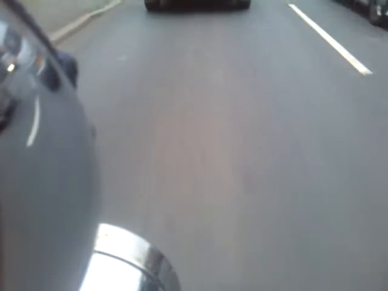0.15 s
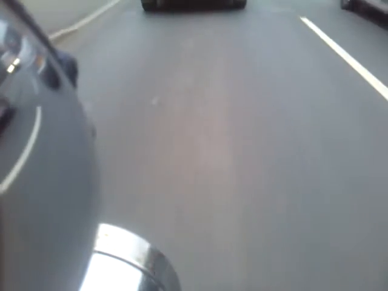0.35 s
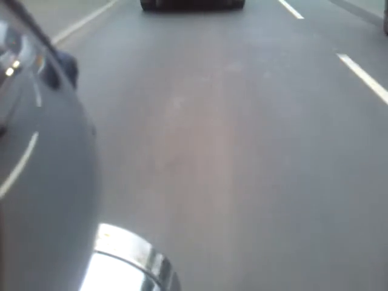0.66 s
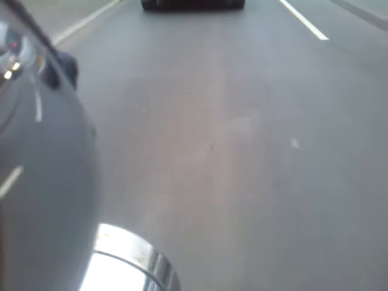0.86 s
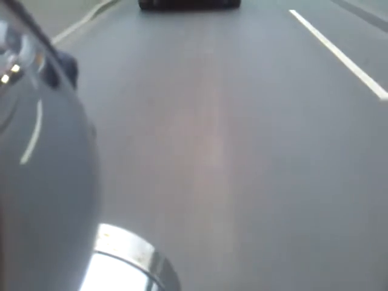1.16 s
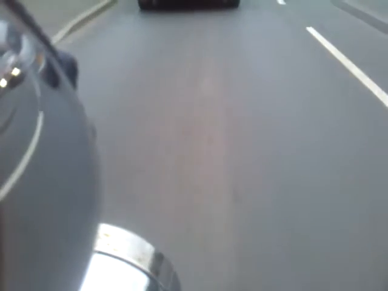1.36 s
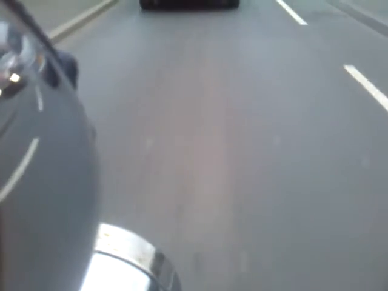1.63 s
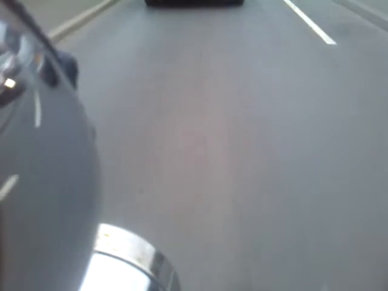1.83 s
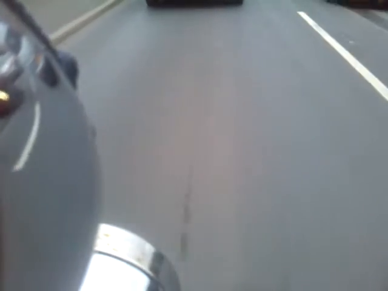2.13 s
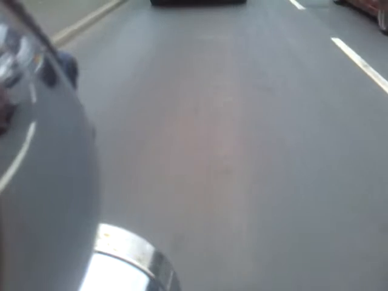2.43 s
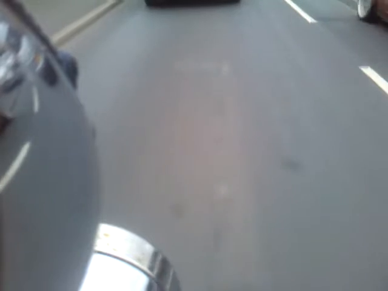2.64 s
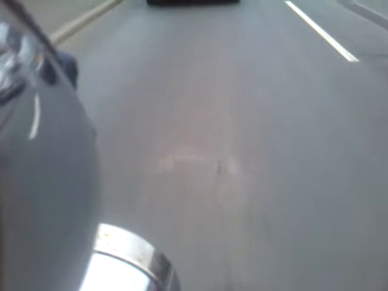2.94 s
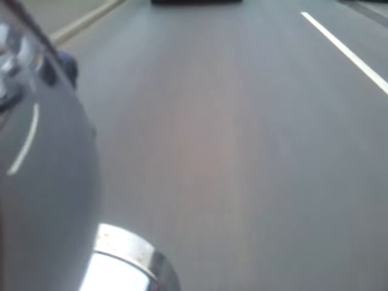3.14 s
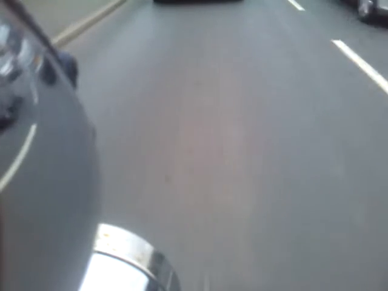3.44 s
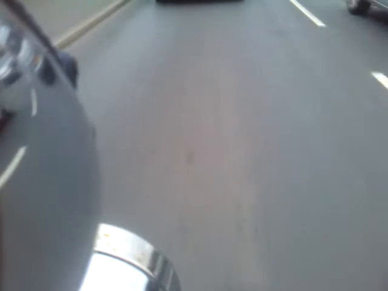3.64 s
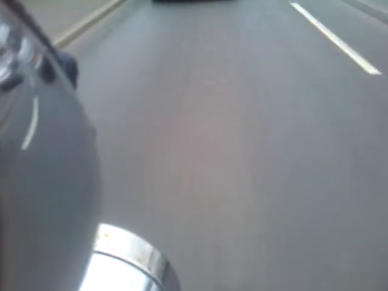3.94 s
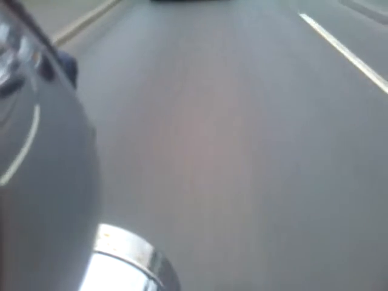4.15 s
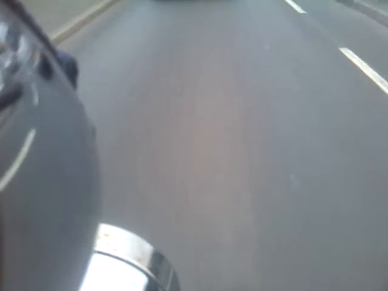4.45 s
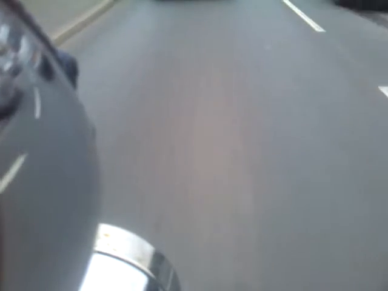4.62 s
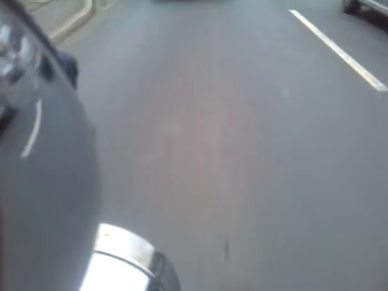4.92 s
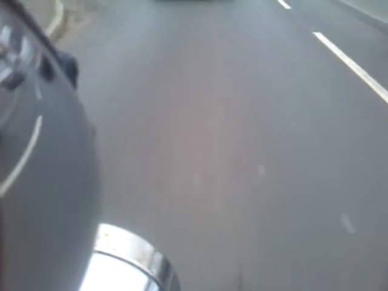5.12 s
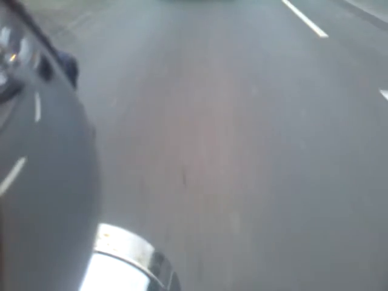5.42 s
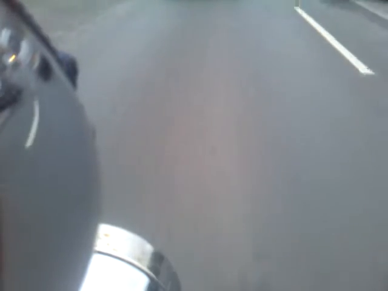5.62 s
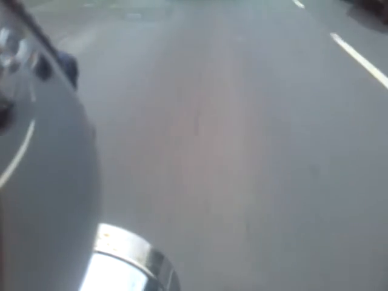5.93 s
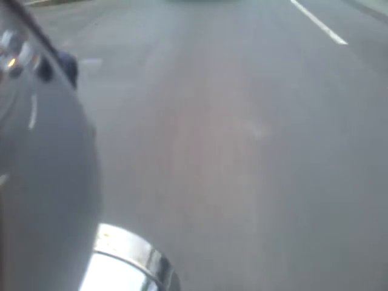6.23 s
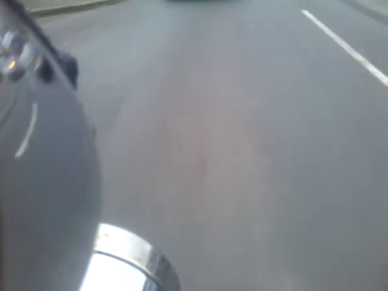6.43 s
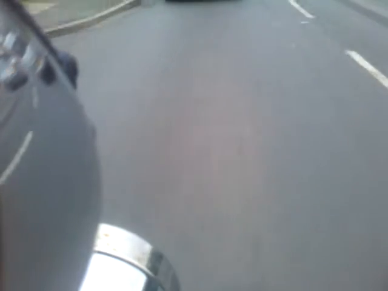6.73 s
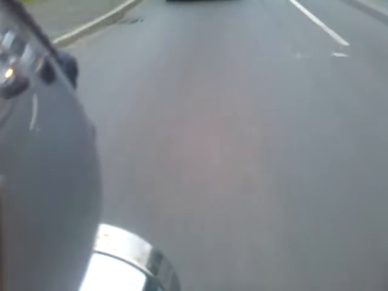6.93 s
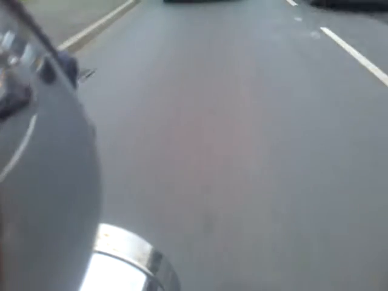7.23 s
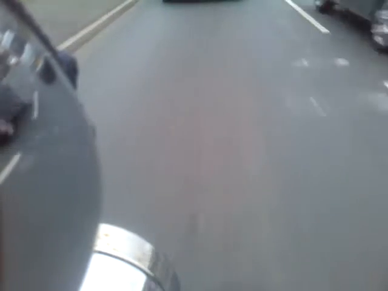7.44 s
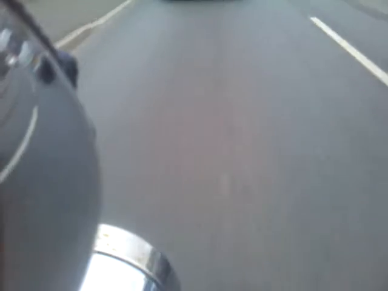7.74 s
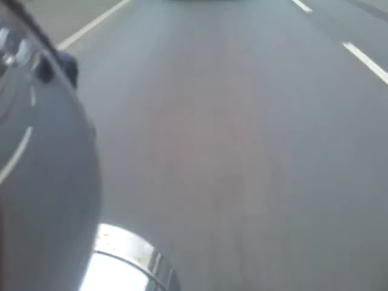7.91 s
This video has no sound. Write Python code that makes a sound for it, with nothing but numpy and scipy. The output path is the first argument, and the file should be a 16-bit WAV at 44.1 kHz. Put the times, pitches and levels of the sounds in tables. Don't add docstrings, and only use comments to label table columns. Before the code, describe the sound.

A motorcycle cruises in a low, rattly drone, then opens up, its engine and gear whine climbing as wind batters and overloads the microphone.

```python
import sys
import numpy as np
from scipy import signal
from scipy.fft import rfft, irfft
from scipy.io import wavfile
from scipy.ndimage import uniform_filter1d

SR = 44100
rng = np.random.default_rng(int(sys.argv[2]) if len(sys.argv) > 2 else 0)


def attenuation_scalar(level_db):
    decades = np.asarray(level_db, float) / 20
    return 10 ** decades


def to_wav(s):
    ch = np.atleast_2d(s).T
    pcm = np.round(np.clip(ch, -1, 1) * 32767)
    wavfile.write(sys.argv[1], SR, pcm.astype(np.int16))


N = 355887
TIME = np.arange(N) / SR

# frequency [Hz], density [dB per Hz].
ROAR_SPECTRUM = [(20, -27), (40, -10.5), (90, -2), (150, 0), (350, -8), (620, -17.5), (1350, -17),
                 (1960, -33.5), (2790, -30), (4290, -41), (4780, -49.5), (9800, -52), (11500, -55.5),
                 (15600, -60)]
# time [s], level [dB].
ROAR_LEVEL = [
    (0, -27.5),
    (2, -27),
    (4, -25),
    (5.5, -25),
    (6.5, -22),
    (8.07, -25.5),
]
# frequency [Hz], width [Hz], level [dB].
CAVITIES = [(350, 60, -37), (690, 40, -44), (1310, 200, -40), (1750, 150, -52), (2800, 120, -61),
            (6200, 400, -72), (9400, 600, -72)]
# frequency [Hz], density [dB per Hz].
WIND_SPECTRUM = [(20, -33), (45, -13.5), (90, -6), (200, -9), (400, -13.5), (800, -23), (2000, -35),
                 (4000, -47.5), (8000, -65), (15000, -70)]
# middle [s], length [s], rise [dB], brightening [dB].
GUST_TIMES = [(.65, 0.068, 3, -15), (1.5, 0.033, 3, 0), (2.3, 0.082, 1.5, -5), (2.765, 0.031, 5, -21),
              (3.6, 0.058, 1.5, -1), (5.55, 0.14, 2.5, -3), (5.83, 0.053, 5.5, -4.5),
              (5.95, 0.084, 2.5, -6), (6.28, 0.15, 4, -1.5), (6.43, .12, 3, 0.5), (6.76, 0.21, 2, 2),
              (7.04, 0.26, 4.5, 3), (7.38, 0.088, 0.5, 4.5), (7.6, 0.085, 2, -1.5), (7.84, 0.096, 5, -4.5),
              (7.98, .05, 3.5, 2)]
# start [s], peak [dB], frequency [Hz].
SLAPS = [(.906, -25, 494.3), (2.542, -15.5, 356.3), (2.32, -23, 536), (2.759, -11.5, 229.6),
         (2.771, -13, 257.2), (2.814, -20, 250), (6.229, -18.5, 1973), (6.301, -13.5, 1070),
         (6.973, -18, 906), (7.016, -21, 1760), (7.129, -23, 1820), (7.159, -13, 755), (7.366, -23, 1560),
         (7.422, -16, 774), (7.734, -16, 798), (7.836, -23, 1190), (7.878, -21.5, 670.2),
         (7.981, -23, 1440)]
# start [s], length [s], frequency [Hz], level [dB].
PASSING_SQUEAK = (4.428, .058, 11825, -63)
# middle [s], length [s], rise [dB].
ROAD_BUMPS = [(.03, 0.063, 19.5), (.98, .04, 2), (1.12, 0.059, 5.5), (2.15, .12, 3), (3.33, .05, 3),
              (3.46, 0.053, 3), (3.61, 0.041, 4), (3.75, 0.039, 7), (4.63, .08, 10), (4.78, 0.062, 7),
              (4.98, .1, 9)]
# frequency [Hz], width [Hz], level [dB].
RINGING_MODES = [(4240, 130, 7), (5240, 120, -9), (10470, 100, -2), (11160, 180, -1), (12580, 90, -1)]
# frequency [Hz], width [Hz], level [dB].
DRY_MODES = [(6700, 300, -6), (7420, 130, -1), (7900, 250, -2), (8900, 450, 0)]
# frequency [Hz], width [Hz], level [dB].
TICK_MODES = [(4400, 900, -2), (6200, 800, 0), (7800, 1500, -1), (9400, 1200, -3)]
# time [s], crank speed [Hz], load as level of the second order [dB].
RIDE = [(0.0, 53, -32), (0.2, 48.35, -38), (0.6, 49.2, -37), (0.8, 53.3, -40), (1.0, 54.87, -26.5),
        (1.17, 59.46, -23.5), (1.45, 57.28, -28.5), (2.4, 55.27, -31), (3.15, 54.6, -26.5),
        (3.5, 57.24, -24), (4.0, 57.73, -24.5), (4.4, 59.77, -21), (5.05, 63.91, -18.5),
        (5.85, 70.93, -16.5), (6.4, 78.35, -15), (7.1, 88.66, -13), (7.6, 91.95, -15.5), (8.07, 89, -20.5)]
# pitch [Hz], level [dB].
FIRST_ORDER = [(48, -30), (58, -28), (63, -25), (70, -20), (79, -16), (87, -20.5), (92, -22.5)]
# pitch [Hz], level [dB].
THIRD_ORDER = [(145, -23.5), (165, -26.5), (185, -31.5), (205, -34), (228, -24), (262, -20.5), (272, -32)]
# multiple of crank speed, level relative to load [dB].
OTHER_ORDERS = [(1.5, -33), (3.5, -24.5), (4, -16.5), (5, -21), (6, -27.5), (7, -32.5)]
# frequency [Hz], width [Hz], lift [dB].
FRAME_MODES = [(255.3, 25, 13), (435, 36, 19), (532, 50, 20.5)]

GEAR_TEETH = 21.55


def evened(x):
    return x / np.sqrt(np.mean(x ** 2) + 1e-20)


def curves(rows, t=TIME):
    s, *columns = np.transpose(rows)
    return [np.interp(t, s, c) for c in columns]


def read(points, hz):
    f, value = np.transpose(points)
    return np.interp(np.log(hz + 1), np.log(f + 1), value)


def swells(rows, t=TIME, column=2):
    return sum(row[column] / (1 + (2 * (t - row[0]) / row[1]) ** 4) for row in rows)


def off_peak(hz, peak_hz, below_db, above_db):
    return -np.maximum(below_db * (peak_hz - hz), above_db * (hz - peak_hz))


def wander(low_hz, high_hz):
    count = N // 32 + 2
    steps = rfft(rng.standard_normal(count))
    hz = np.fft.rfftfreq(count, 32 / SR)
    slow = irfft(steps * (hz > low_hz) / (1 + (hz / high_hz) ** 4), count)
    return np.interp(np.arange(N) / 32, np.arange(len(slow)), evened(slow))


def resonate(x, hz, width):
    turn = np.exp(2j * np.pi * np.cumsum(hz * np.ones(N)) / SR)
    r = np.exp(-np.pi * width / SR)
    return 2 * (turn * signal.lfilter([1 - r], [1, -r], x / turn + 1e-18)).real


def resonant_noise(hz, width):
    return evened(resonate(resonate(rng.standard_normal(N), hz, width), hz, width))


def shaped_noise(field_db, patchy_db, size):
    hop = size // 4
    frames = N // hop + 5
    hz = np.fft.rfftfreq(size, 1 / SR)[:, None]
    a, b, patches = rng.standard_normal((frames, len(hz), 3)).T
    patches = uniform_filter1d(patches, size=6, axis=0)
    patches = evened(uniform_filter1d(patches, size=12, axis=1))
    level_db = field_db(hz, np.arange(frames) * hop / SR) + patchy_db * patches
    return signal.istft((a + 1j * b) * attenuation_scalar(level_db), nperseg=size, noverlap=size - hop)[1][:N]


def roar(turns):
    wide = evened(shaped_noise(lambda hz, t: read(ROAR_SPECTRUM, hz) + 0 * t, patchy_db=1.5, size=2048))
    cavities = sum(attenuation_scalar(db) * resonant_noise(hz, width) for hz, width, db in CAVITIES)
    pulse = 1 + 0.048 * np.cos(2 * np.pi * turns)
    return attenuation_scalar(curves(ROAR_LEVEL)[0]) * (wide + attenuation_scalar(26.5) * cavities) * pulse


def wind_levels(hz, t):
    from_hz, full_hz = 63.27, 76.15
    speed = np.clip(curves(RIDE, t)[0], from_hz, full_hz) - from_hz
    gust_db = swells(GUST_TIMES, t) / (1 + (110 / (hz + 1)) ** 2)
    level_db = -25.5 + .4 * speed + gust_db
    bright_db = -24 + 0.2654 * speed + swells(GUST_TIMES, t, column=3)
    return level_db, bright_db


def wind(turns):
    def field_db(hz, t):
        level_db, bright_db = wind_levels(hz, t)
        reach = np.clip(np.log((hz + 1) / 500) / np.log(4), 0, 1.3)
        muffle_db = -10 * np.log10(1 + (hz / 4600) ** 8)
        return read(WIND_SPECTRUM, hz) + muffle_db + 1.61 * (level_db + 19.5) + .5 * reach * (bright_db + 15.0)

    lumps = attenuation_scalar(2. * wander(3.8, 50.0))
    gusts = lumps * shaped_noise(field_db, patchy_db=0.5, size=1024)
    high = signal.lfilter(*signal.butter(2, 700, "high", fs=SR), gusts)
    shaken_db = 5 * np.cos(2 * np.pi * turns)
    bursts_db = 8 * np.tanh(wander(60, 400) / 2)
    crackle = attenuation_scalar(shaken_db + bursts_db) - 1
    return attenuation_scalar(-17.0) * (gusts + crackle * high)


def slaps():
    out, t = np.zeros(N + SR), np.arange(900) / SR
    for s, db, hz in SLAPS:
        grit = signal.lfilter(*signal.butter(4, min(3 * hz, 3000), fs=SR), rng.standard_normal(900))
        attack = (1 - np.exp(-t / .0007)) ** 2
        shape = 2.6 * attack * np.exp(-t / (.002 + .6 / hz))
        out[round(s * SR):][:900] += attenuation_scalar(db) * (-np.sin(2 * np.pi * hz * t) + 0.99 * grit) * shape
    return out[:N]


def squeak():
    s, length, hz, db = PASSING_SQUEAK
    swell = np.sin(np.pi * np.clip((TIME - s) / length, 0, 1))
    return attenuation_scalar(db) * np.sin(2 * np.pi * hz * TIME) * swell


def rattle(turns, modes, level_db, late, spread_db, bounce):
    at = np.flatnonzero(np.diff(np.floor(turns - late)) > 0)
    shift, again, gap = rng.random((len(at), 3)).T
    firing_db = 1.5 * (-1) ** np.arange(len(at))
    force = attenuation_scalar(firing_db + 1.5 * spread_db * np.tanh(wander(3., 40.)[at] / 1.3))
    first = at + (60 * shift).astype(int)
    second = at + (120 + 300 * gap).astype(int)
    out = np.zeros(N)
    for hz, width, db in modes:
        knocks = np.zeros(N + SR)
        share = force * attenuation_scalar(1.5 * rng.standard_normal(len(at)))
        knocks[first] = share
        knocks[second] = -.7 * share * (again < bounce)
        ring = resonate(resonate(knocks[:N], hz, width), hz, 2 * width)
        out += attenuation_scalar(db) * evened(ring)
    return attenuation_scalar(level_db) * evened(out)


def loose_parts(hz, turns):
    from_hz, to_hz = 55, 58.4
    speed_db = (off_peak(hz, from_hz, 5, 0) + off_peak(hz, to_hz, 0, 3)).clip(-16)
    loose_db = speed_db + 2.5 * wander(2, 12)
    bumps_db = swells(ROAD_BUMPS)
    ring_db = -61.5 + loose_db + off_peak(hz, from_hz, 0, 1.2) + .5 * bumps_db
    ringing = rattle(turns, RINGING_MODES, ring_db, late=.3, spread_db=2.6, bounce=.4)
    dull = rattle(turns, DRY_MODES, -64 + loose_db + bumps_db, late=.15, spread_db=2.6, bounce=.6)
    return ringing + dull


def ticks(hz, turns):
    tick_db = -54 + off_peak(hz, 84, 0.76, 0.8) + .6 * swells(GUST_TIMES)
    return rattle(turns, TICK_MODES, tick_db, late=.9, spread_db=3.5, bounce=.3)


def whine_levels(hz):
    casing_hz = 63.5
    rise = (TIME - 3.8) / .55
    fall = (6.87 - TIME) / .25 + 1
    slack = 1 - np.clip(np.minimum(rise, fall), 0, 1)
    mesh_db = -33 + off_peak(hz, casing_hz, 1, .55) / (1 + slack) - 14 * slack
    octave_db = -52 + off_peak(hz, casing_hz, .9, 0) - 20 * slack
    return mesh_db, octave_db


def gear(hz, turns):
    throb, out = 1 + .4 * np.cos(2 * np.pi * turns), 0
    for k, level_db in enumerate(whine_levels(hz), 1):
        fuzz = resonant_noise(k * GEAR_TEETH * hz, k * 70)
        tone = np.sqrt(2) * np.cos(2 * np.pi * k * GEAR_TEETH * turns + k * .5 * wander(2, 30))
        out = out + attenuation_scalar(level_db) * (.8 * tone + .85 * fuzz)
    return throb * out


def exhaust(hz, turns, load_db):
    levels = [(1, read(FIRST_ORDER, hz)), (2, load_db), (3, read(THIRD_ORDER, 3 * hz))]
    steady_db = uniform_filter1d(load_db, size=SR // 2)
    uneven = np.clip((-17 - steady_db) / 12, .2, 1)
    levels.append((2.5, -28.5 - np.clip(abs(hz - 63) / 2.5, 0, 5)))
    for k, db in OTHER_ORDERS:
        lift = sum(attenuation_scalar(d) / (1 + ((k * hz - f) / (w / 2)) ** 2) for f, w, d in FRAME_MODES)
        levels.append((k, db + 0.8 * steady_db - 11.5 + 20 * np.log10(1 + lift)))
    orders = 0
    for k, db in levels:
        flutter_db = uneven * wander(6, 25)
        jitter = .15 * uneven * wander(6, 25)
        orders = orders + attenuation_scalar(db + flutter_db) * np.cos(2 * np.pi * k * turns + jitter)
    pipe = resonant_noise(137.0, 42.0)
    return np.sqrt(2) * orders + attenuation_scalar(-30.5) * uneven * pipe


def scene():
    hz, load_db = curves(RIDE)
    hz = uniform_filter1d(hz, size=SR // 8)
    turns = np.cumsum(hz) / SR
    air = roar(turns) + wind(turns) + slaps() + squeak()
    metal = loose_parts(hz, turns) + ticks(hz, turns)
    engine = gear(hz, turns) + exhaust(hz, turns, load_db)
    return (air + metal + engine)[None]


def low_pass(x):
    return signal.sosfilt(signal.butter(12, 15780, fs=SR, output="sos"), x)


def record(dry):
    limit, knee = .72, 7.
    clipped = dry / (1 + abs(dry / limit) ** knee) ** (1 / knee) - .0055
    ends = np.clip(np.minimum(TIME, TIME[::-1]) / .002, 0, 1)
    return low_pass(clipped * ends)


dry = scene()
out = record(dry)
to_wav(out)
```